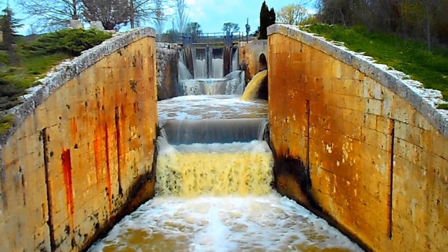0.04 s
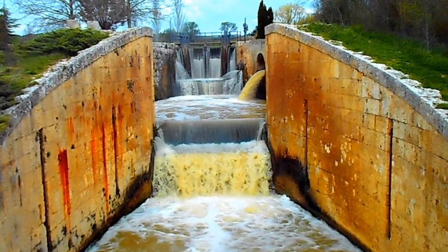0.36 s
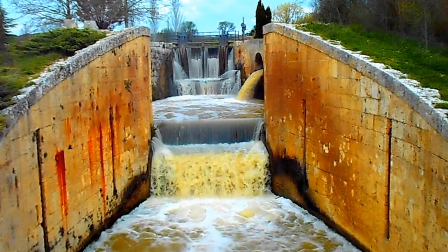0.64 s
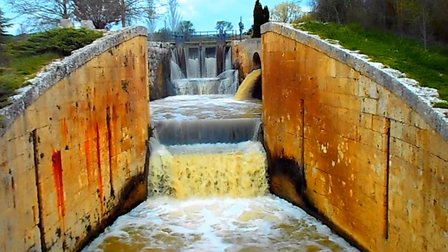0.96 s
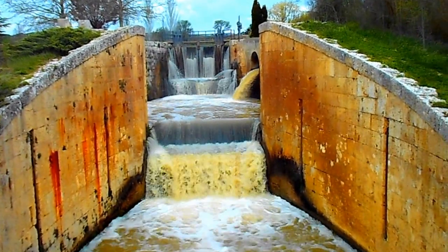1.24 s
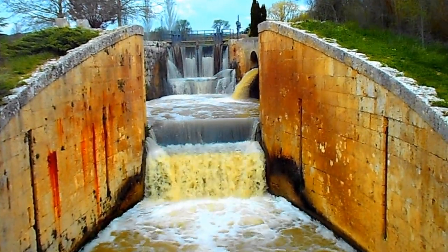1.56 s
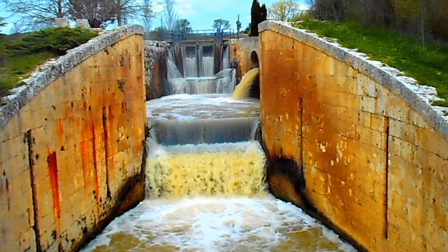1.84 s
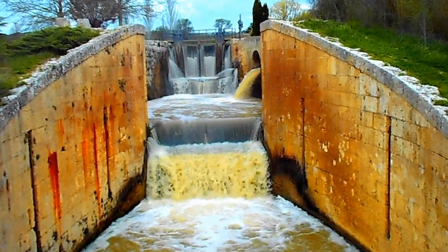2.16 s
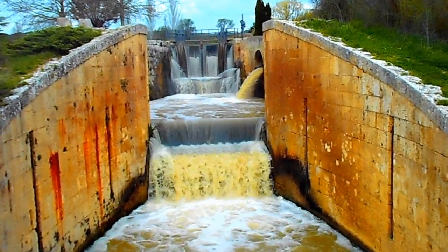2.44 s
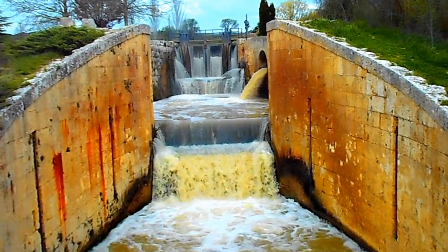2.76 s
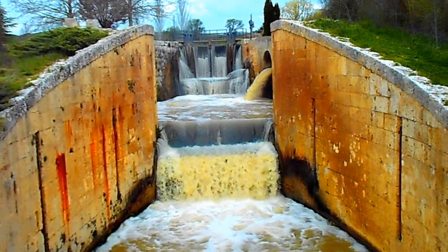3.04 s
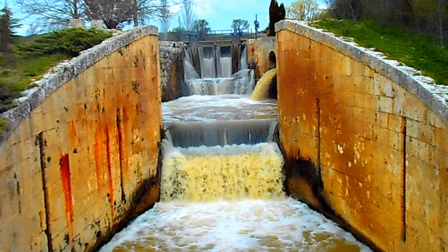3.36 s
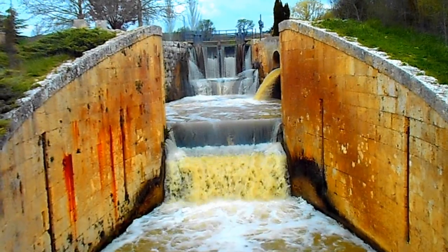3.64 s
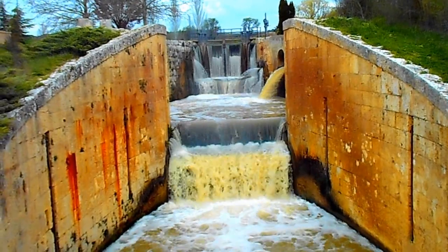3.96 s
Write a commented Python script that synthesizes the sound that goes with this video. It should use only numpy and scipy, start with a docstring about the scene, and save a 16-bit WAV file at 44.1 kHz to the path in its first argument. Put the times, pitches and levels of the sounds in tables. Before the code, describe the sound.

Water cascades down a stone canal lock while wind buffets the microphone.

```python
"""Water cascades down the steps of a stone canal lock: a broad, bright rush with a fine spray of drops.
From the start, wind at the microphone adds a lumpy rumble, short blows from eddies and pops from vortices.
After a second the wind strengthens and its hardest blows overload the microphone, while the rush sinks
far down, to its lowest near 2 s. By 3 s the rush has swelled back, and lighter blows go on to the end.
The sound is mono."""
import sys
import numpy as np
from scipy import signal
from scipy.fft import rfft, irfft
from scipy.io import wavfile
from scipy.ndimage import uniform_filter1d

SR = 44100
rng = np.random.default_rng(int(sys.argv[2]) if len(sys.argv) > 2 else 0)


def unload_audio(sound):
    """Save the sound as a 16-bit wav file, at the path given as the first command line argument."""
    columns = np.transpose(np.atleast_2d(sound))
    # keep every value between -1 and 1, then stretch to whole-number steps
    steps = np.round(np.clip(columns, -1, 1) * 32767)
    wavfile.write(sys.argv[1], SR, steps.astype(np.int16))


N = 176400
CUTOFF_HZ = 11600


def from_db(db):
    """Amplitude ratio: tenfold for every 20 dB."""
    return 10 ** (np.asarray(db) / 20)


def unit_rms(x):
    """Normalisation to rms 1."""
    return x / np.sqrt(np.mean(x ** 2) + 1e-20)


def in_time(rows):
    """Linear interpolation of (t/s, value) rows at every sample."""
    return np.interp(np.arange(N) / SR, *np.transpose(rows))


def drift(rate_hz):
    """Random modulation: low-passed Gaussian noise of rms about 1."""
    hop, settling = 40, 2000
    pole = np.exp(-2 * np.pi * rate_hz * hop / SR)
    noise = rng.standard_normal(N // hop + settling + 2)
    slow = signal.lfilter([1], [1, -2 * pole, pole * pole], noise)[settling:]
    return np.interp(np.arange(N) / hop, np.arange(len(slow)), unit_rms(slow))


def resonance(x, hz, width_hz):
    """Damped resonator: the wider its band, the sooner it dies away."""
    r = np.exp(-np.pi * width_hz / SR)
    return signal.lfilter([1 - r, 0, r - 1], [1, -2 * r * np.cos(2 * np.pi * hz / SR), r * r], x + 1e-18)


def low_pass(x, hz):
    """Second-order roll-off: 12 dB per octave above the corner."""
    return signal.sosfilt(signal.butter(2, hz, fs=SR, output="sos"), x)


def evened(x, span_s):
    """Division by the running rms holds noise at a steady level."""
    return x / np.sqrt(uniform_filter1d(x ** 2, int(span_s * SR)) + 1e-12)


def patchy_noise(spectrum, flicker_db, rate_hz, bands=18):
    """Independent amplitude modulation of each band of a coloured noise; rms 1."""
    hz = np.maximum(np.arange(N // 2 + 1) * SR / N, 1)
    points_hz, db = np.transpose(spectrum)
    colour = from_db(np.interp(np.log(hz), np.log(points_hz), db))
    bins = rfft(rng.standard_normal(N)) * colour * (hz > 10)
    band = np.searchsorted(np.geomspace(60, CUTOFF_HZ, bands)[:-1], hz)
    layers = (irfft(bins * (band == k), N) * from_db(flicker_db * drift(rate_hz)) for k in range(bands))
    return unit_rms(sum(layers))


def spray(drops_per_s=2000, spread_db=2, q=2.85, pitch_count=20):
    """Impulse response: each droplet or bubble bursting in the foam rings for a few cycles."""
    sizes = from_db(spread_db * np.minimum(rng.exponential(1, N), 5)) * rng.choice([-1, 1], N)
    impulses = sizes * (rng.random(N) < drops_per_s / SR)
    pitch_index = rng.integers(0, pitch_count, N)
    pitches_hz = np.geomspace(600, 9000, pitch_count)
    rings = (resonance(impulses * (pitch_index == k), hz, hz / q) for k, hz in enumerate(pitches_hz))
    return unit_rms(sum(rings))


# Envelope of the falling water: t/s, relative level/dB
RUSH_ENVELOPE = [(0, -19.5), (0.1, -22), (0.16, -21), (0.45, -20), (0.7, -19.5), (0.97, -20), (1.01, -21.5),
                 (1.26, -25), (1.31, -29), (1.57, -30.0), (1.65, -34.0), (1.79, -38), (2.05, -40),
                 (2.35, -34.0), (2.62, -28.5), (2.8, -24.5), (3.0, -21.5), (3.2, -21), (3.38, -22.5),
                 (3.75, -21), (3.98, -21.5)]
# Spectral density of the falling water: f/Hz, relative level/dB
RUSH_SPECTRUM = [(30, -18), (80, -2), (200, -2), (400, 3.5), (650, 3.5), (1000, 3), (1400, 2.6),
                 (2000, 0.25), (2400, -4), (2750, -2.5), (3050, 1.5), (3450, 4), (4500, 4), (5200, 4.3),
                 (5900, 2.5), (7000, 4), (9000, 4), (10100, 3), (10550, -1.5), (11000, -13.5),
                 (11600, -30.5)]


def cascade():
    """Incoherent superposition: falling water sums to broadband noise, surging slightly with its spray."""
    rush = from_db(1.16) * patchy_noise(RUSH_SPECTRUM, flicker_db=0.62, rate_hz=15)
    drops = from_db(-13) * low_pass(spray(), hz=7850)
    surge_db = 0.25 * drift(rate_hz=6.7)
    return (rush + drops) * from_db(in_time(RUSH_ENVELOPE) + surge_db)


# Envelope of the wind's rumble between the blows: t/s, relative level/dB
RUMBLE_ENVELOPE = [(0, -30), (0.13, -28.5), (0.3, -33.5), (0.8, -39), (0.97, -31.5), (1.15, -21.5),
                   (1.4, -23.5), (1.53, -28), (1.65, -16.5), (1.85, -29.5), (1.95, -27.5), (2.15, -28.5),
                   (2.55, -28.5), (2.63, -35.5), (3.0, -35.5), (3.17, -23), (3.38, -31.5), (3.6, -23.5),
                   (3.8, -23), (4.0, -32)]
# Spectral density of the rumble: f/Hz, relative level/dB
RUMBLE_SPECTRUM = [(15, -3.5), (28, 0.5), (50, -3), (78, -4), (110, -2.5), (160, -6.5), (240, -6.5),
                   (370, -14.5), (600, -18.5), (1000, -25), (2000, -33), (4000, -73)]


def wind_rumble(lump_db=4.5, lump_rate_hz=38, gain_db=-1.5):
    """Turbulence: pressure at the microphone port fluctuates in lumps, chiefly at low frequencies."""
    air = patchy_noise(RUMBLE_SPECTRUM, flicker_db=1.0, rate_hz=lump_rate_hz)
    lumps = from_db(lump_db * drift(lump_rate_hz))
    return evened(air * lumps, span_s=0.094) * from_db(gain_db + in_time(RUMBLE_ENVELOPE))


# Eddies striking the microphone: middle t/s, half duration/s, level/dB, centre f/Hz
EDDIES = [(0.083, 0.02, -28.5, 300), (0.438, 0.02, -24.5, 169), (0.505, 0.013, -33, 40),
          (0.853, 0.021, -35, 32), (0.967, 0.015, -19, 37.8), (0.975, 0.012, -17.5, 179),
          (1.113, 0.018, -16, 273), (1.184, 0.015, -25, 180), (1.247, 0.0077, -13, 210),
          (1.26, 0.0071, -7, 593), (1.287, 0.021, -18.5, 226), (1.372, 0.057, -23.5, 220),
          (1.44, 0.0072, -17.5, 290), (1.491, 0.0078, -17.5, 122), (1.57, 0.0056, -12, 223),
          (1.596, 0.011, -13.5, 231), (1.622, 0.022, -12, 250), (1.639, 0.02, -16, 120),
          (1.644, 0.0079, -7, 274), (1.669, 0.012, -17.5, 169), (1.704, 0.033, -13, 327),
          (1.738, 0.012, -15.5, 272), (1.785, 0.032, -16.5, 35.7), (1.817, 0.018, -20.5, 162),
          (1.833, 0.0094, -23, 330), (1.88, 0.026, -14, 211), (1.982, 0.014, -36, 230),
          (2.04, 0.011, -20.5, 180), (2.113, 0.036, -22.5, 131), (2.258, 0.021, -25, 213),
          (2.34, 0.022, -30.5, 200), (2.418, 0.033, -23, 49.7), (2.565, 0.029, -27.5, 168),
          (2.86, 0.009, -27, 100), (3.137, 0.019, -32, 190), (3.206, 0.015, -15.5, 270),
          (3.497, 0.016, -21, 253), (3.609, 0.019, -22, 187), (3.661, 0.014, -24, 220),
          (3.779, 0.015, -24.5, 350), (3.822, 0.016, -19.5, 293)]


def wind_buffets():
    """Convected turbulence: each passing eddy is a band of dull noise under a Gaussian envelope."""
    out, t = np.zeros(N), np.arange(N) / SR
    for middle_s, half_s, db, hz in EDDIES:
        near = np.abs(t - middle_s) < 0.15
        noise = rng.standard_normal(SR)[:near.sum()]
        eddy = low_pass(resonance(noise, hz, width_hz=1.08 * hz), hz=2.13 * hz)
        swell = np.exp(-2 * ((t[near] - middle_s) / half_s) ** 2)
        out[near] += from_db(db) * evened(eddy, span_s=2 * half_s) * swell
    return out


def vortex_pulse(middle_s, peak_db, hz, softness=3.9):
    """Bipolar pressure pulse: a vortex passing the port gives one push, then one pull."""
    phase = 2 * np.pi * hz * (np.arange(N) / SR - middle_s)
    near = np.abs(phase) < 20
    swing = -phase[near] / (1 + phase[near] ** 2 / (2 * softness)) ** softness
    out = np.zeros(N)
    out[near] = from_db(peak_db) * swing / np.abs(swing).max()
    return out


def wind_knocks(knocks_per_s=45, centre_hz=220):
    """Shot noise: lesser vortices arrive at random, their strength following the rumble's envelope."""
    out, wind_db = np.zeros(N), in_time(RUMBLE_ENVELOPE)
    for when, weakness, pitch in rng.random((int(knocks_per_s * N / SR), 3)):
        peak_db = wind_db[int(when * N)] + 4.5 - weakness
        hz = centre_hz * 2 ** (2 * pitch - 1)   # within an octave either way
        out += vortex_pulse(when * N / SR, peak_db, hz)
    return out


# Small fast vortices crossing the port: t/s, peak level/dB, characteristic f/Hz
VORTICES = [(0.975, -7.5, 476), (1.186, -6, 248), (1.26, -7.5, 710), (1.264, -12, 880), (1.292, -13, 640),
            (1.318, -9.5, 550), (1.353, -3.5, 463), (1.46, -8.5, 380), (1.57, -6, 560), (1.595, -4.5, 220),
            (1.632, -10, 1300), (1.643, -4, 470), (1.701, -15, 1700), (1.704, -4, 550), (1.739, -12, 470),
            (1.739, -18, 1800), (1.886, -13, 900), (1.981, -15.5, 394), (2.067, -12, 483),
            (2.113, -15, 252), (2.562, -20, 342), (3.085, -14.5, 400), (3.242, -10.5, 536),
            (3.501, -11, 340), (3.711, -11, 250), (3.786, -7.5, 470)]


def wind_pops():
    """Time-frequency reciprocity: the briefer a vortex's pulse, the higher its pop."""
    return sum(vortex_pulse(middle_s, peak_db, hz) for middle_s, peak_db, hz in VORTICES)


def scene():
    """Linear superposition of water and wind, alike in both channels."""
    pressure = cascade() + wind_rumble() + wind_buffets() + wind_knocks() + wind_pops()
    return np.tile(pressure, (2, 1))


def record(dry):
    """Saturation and band limiting: the microphone clips the hardest blows; the top treble is cut."""
    overload = 0.61   # amplitude at which the microphone saturates
    clipped = dry / (1 + (dry / overload) ** 8) ** (1 / 8)
    treble_cut = signal.ellip(12, 0.1, 90, CUTOFF_HZ, fs=SR, output="sos")
    return signal.sosfilt(treble_cut, clipped)


dry = scene()
out = record(dry)
unload_audio(out)
```